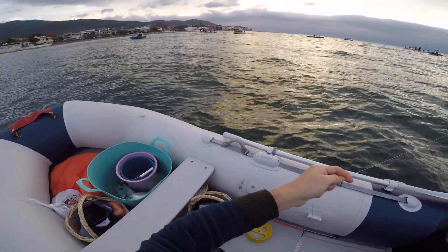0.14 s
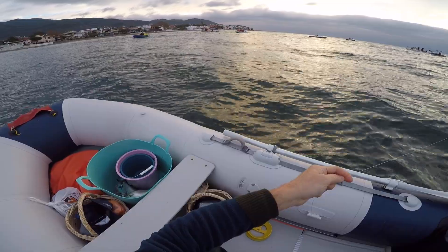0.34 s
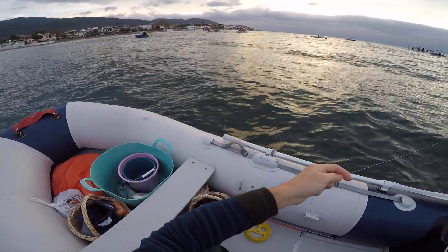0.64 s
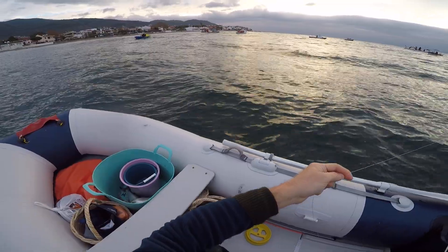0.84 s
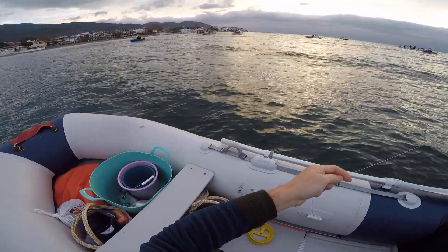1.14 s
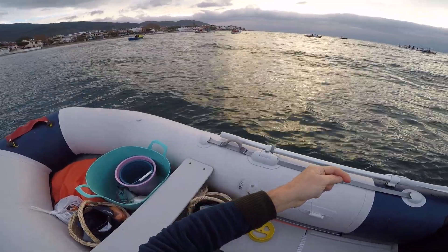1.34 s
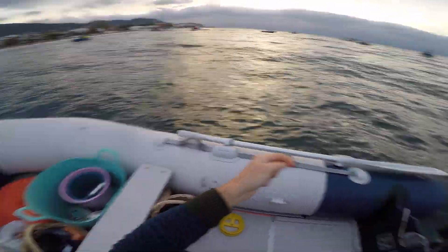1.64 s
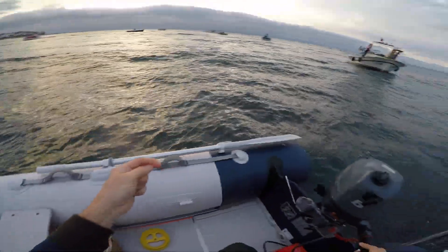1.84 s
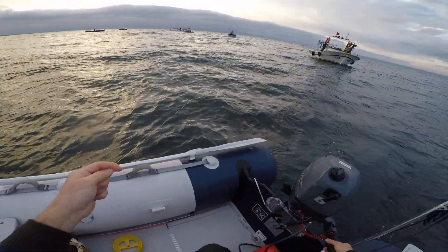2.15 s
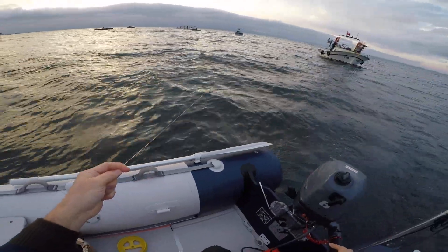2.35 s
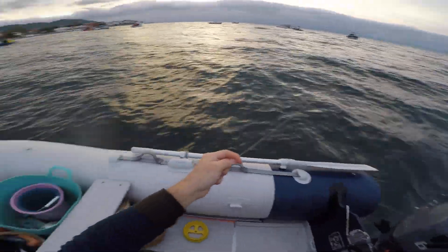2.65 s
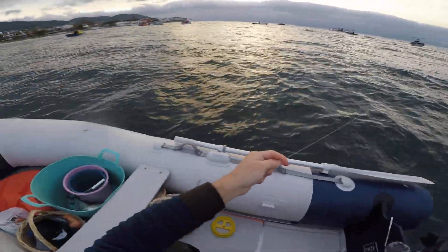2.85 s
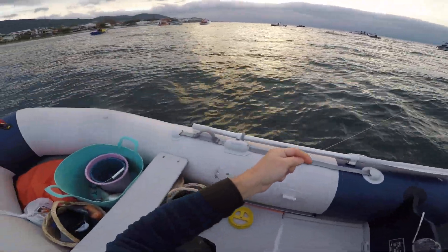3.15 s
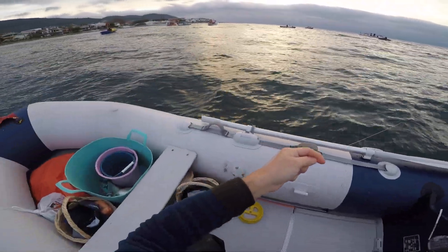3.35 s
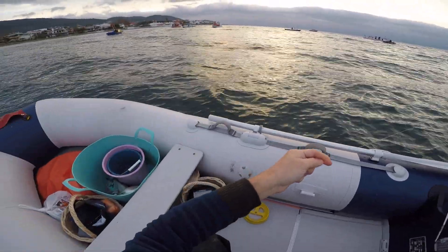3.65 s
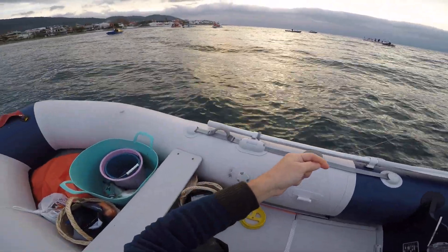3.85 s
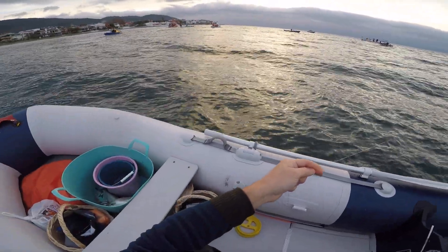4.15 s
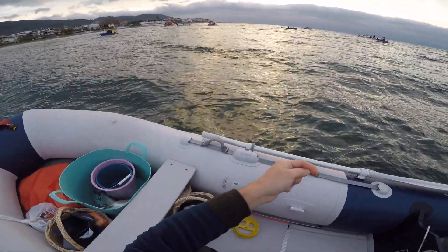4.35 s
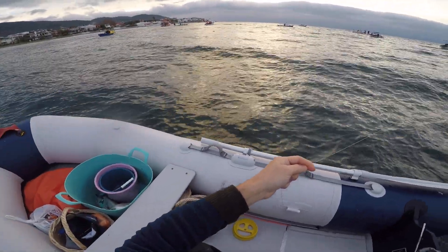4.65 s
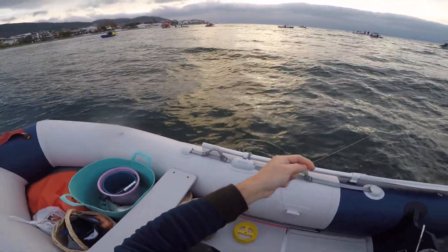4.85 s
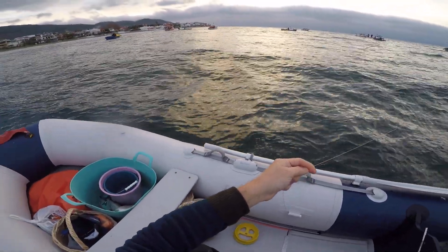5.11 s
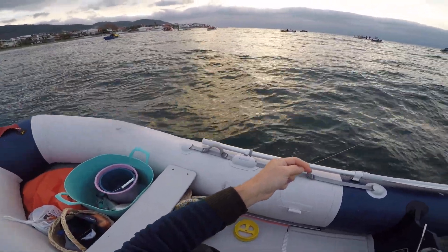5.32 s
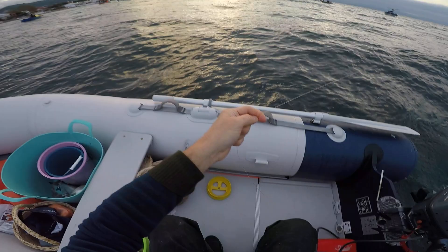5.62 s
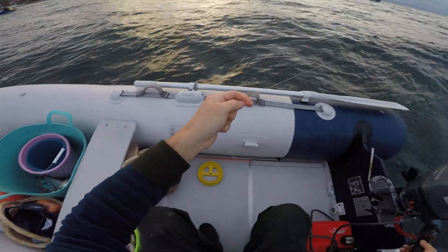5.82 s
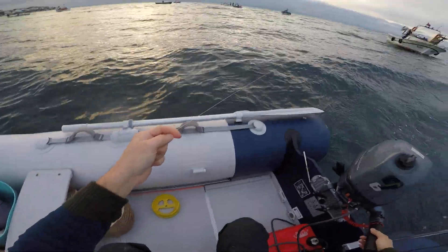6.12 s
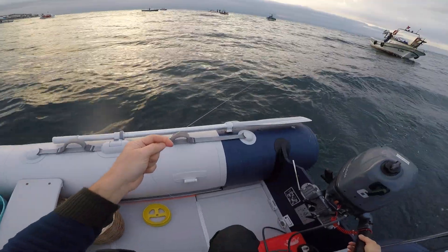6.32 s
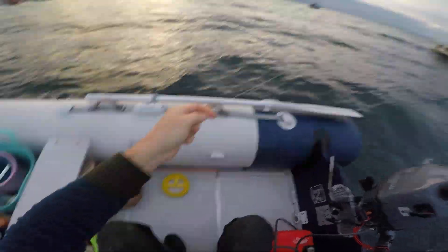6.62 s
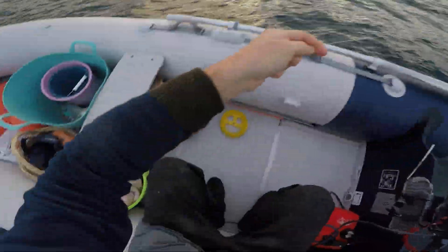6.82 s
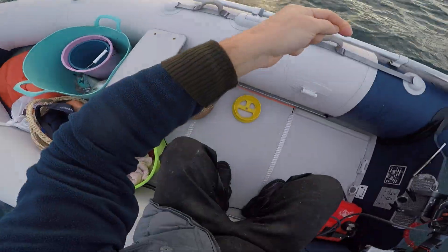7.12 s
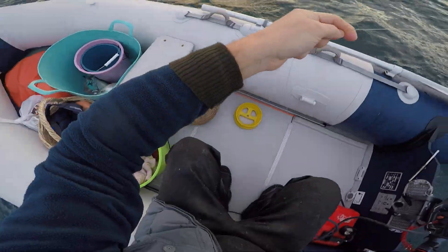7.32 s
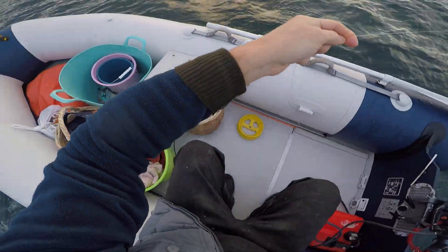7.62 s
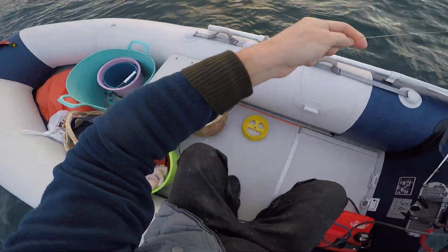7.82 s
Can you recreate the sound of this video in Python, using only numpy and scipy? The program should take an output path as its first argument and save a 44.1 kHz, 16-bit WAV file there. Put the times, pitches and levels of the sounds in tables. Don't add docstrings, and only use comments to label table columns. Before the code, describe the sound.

A small one-cylinder outboard idles continuously for eight seconds, heard close from a head-worn stereo microphone on an inflatable boat. About eleven low exhaust thumps a second, slightly hunting in speed, carry gurgle and a repeating row of hollow casing booms, tappet clicks and ringing metal knocks. From 0 to 1.7 s it is somewhat duller and farther, under rumbling, fluttering wind. Around 1.75 to 2.6 s the head turns and the rattle becomes brighter and more open, with knocks near 1.9 and 2.3 s. It dulls again from 2.8 s; gusts lean right around 3 to 4 s. Wake fizz rises faintly after 4.4 s, with droplet ticks mostly from 4.5 to 6.6 s and a faint high knock at 5.15 s. After 5.7 s the motor is brighter, then fuller and nearer from 6.8 s, with another knock at 7.35 s. It is still running at the end.

```python
import sys
import numpy as np
from scipy import signal
from scipy.fft import rfft, irfft, next_fast_len
from scipy.io import wavfile
from scipy.ndimage import map_coordinates

SR = 44100
rng = np.random.default_rng(int(sys.argv[2]) if len(sys.argv) > 2 else 0)


def invert_db(level):
    return 10 ** (np.asarray(level, dtype=float) / 20)


def inscribe(sig):
    pcm = np.round(np.clip(np.atleast_2d(sig).T, -1, 1) * 32767)
    wavfile.write(sys.argv[1], SR, pcm.astype(np.int16))


N = 351477
STEP = 32

# (time [s], nearness to the motor [dB], turned toward it [0-1], bowed into the boat [0-1])
HEAD = [(0, -2, 0.15, 0.05), (.7, -4.5, 0, 0), (1.56, -1.5, 0, 0), (1.74, -2, 0.97, 0.02),
        (2.5, 0, 0.92, 0.1), (2.8, -0.5, 0.23, 0.2), (3.5, -0.5, 0.2, 0.1), (4.12, 1, .2, 0.3),
        (4.4, 1.5, 0.5, 0.5), (4.7, 0, 0, 0), (5.38, -0.5, 0.2, 0.4), (5.65, 2, 0.67, 0.4),
        (6.3, 0, 0.94, 0.3), (6.6, 1, 0.7, 0.3), (6.85, 0.5, 0.62, 1), (7.25, 0.5, 0.9, 1),
        (7.45, 2.5, 0.7, 0.5), (7.97, 2, 0.55, 0.5)]


def unit(x):
    return x / np.sqrt(np.mean(x ** 2) + 1e-20)


def along(points, hz):
    f, v = np.transpose(points)
    return np.interp(np.log(hz + 1), np.log(f + 1), v)


def curves(rows):
    s, *cols = np.transpose(rows)
    return [np.interp(np.arange(0, N, STEP) / SR, s, c) for c in cols]


def wobble(rate):
    return map_coordinates(rng.standard_normal(400), [np.arange(0, N, STEP) * rate / SR])


def gain_of(db):
    def every_sample(row):
        return np.interp(np.arange(N) / STEP, np.arange(len(row)), row)
    return np.apply_along_axis(every_sample, -1, invert_db(db))


def filtered(x, response):
    m = next_fast_len(N + 4096, True)
    coarse = response(np.fft.rfftfreq(m, 1 / SR)[::8])
    fine = np.repeat(coarse, 8, axis=-1)[..., :m // 2 + 1]
    return irfft(rfft(x, m) * fine, m)[..., :N]


def shaped(x, points):
    return filtered(x, lambda hz: invert_db(along(points, hz)))


def rung(x, modes):
    total = 0
    for k, (hz, width, db) in enumerate(modes):
        strength = gain_of(db + 1.06 * wobble(1.61))
        tone = signal.lfilter(*signal.iirpeak(hz, hz / width, SR), x)
        total = total + (-1) ** k * strength * tone
    return unit(total)


def paired(two, alike):
    def mix(hz):
        turn = np.arccos(np.clip(along(alike, hz), -1, 1)) / 2
        return np.array([np.cos(turn), np.sin(turn)])
    mid, side = filtered(two, mix)
    return np.array([mid + side, mid - side])


def sides(pan_db):
    return invert_db(np.array([pan_db / 2, -pan_db / 2]))


def rings(s, hz, db, fall_ms):
    rise_ms, beat, beat_hz = 1.57, 0.49, 95
    t = np.arange(1024) / SR
    phase = rng.uniform(0, 2 * np.pi, np.shape(s))
    columns = np.broadcast_arrays(s, hz, db, fall_ms, phase)
    s, hz, db, fall_ms, phase = [np.ravel(v)[:, None] for v in columns]
    shape = (1 - np.exp(-1000 * t / rise_ms)) * np.exp(-1000 * t / fall_ms)
    wave = invert_db(db) * shape * np.sin(2 * np.pi * hz * t + phase)
    wave *= 1 + beat * np.cos(2 * np.pi * beat_hz * t)
    at = np.round(np.clip(s, 0, N / SR) * SR).astype(int) + np.arange(len(t))
    return np.bincount(at.ravel(), wave.ravel(), N + SR)[:N]


def gusts(spectra, lumpy_db, rate):
    air = filtered(rng.standard_normal((2, N)), lambda hz: invert_db([along(s, hz) for s in spectra]))
    ports = []
    for port in air:
        lumps = wobble(rate) + 0.32 * wobble(7.5)
        ports.append(unit(port * gain_of(lumpy_db * lumps)))
    return np.array(ports)


def wind():
    # (start [s], length [s], left [dB], right [dB])
    gust_rows = [(-.1, 0.44, -16, -21), (0.442, 0.42, -18, -19), (0.907, 0.44, -20, -18.5),
                 (1.347, 0.27, -22.5, -21), (1.791, 0.096, -18, -18.5), (2.489, 0.15, -16, -22),
                 (2.756, 0.38, -17.5, -25), (3.106, 0.55, -27, -18.5), (3.507, 0.48, -30.5, -19.5),
                 (3.982, 0.37, -27, -27.5), (4.433, 0.11, -24.5, -21.5), (4.588, 0.18, -43.5, -28),
                 (4.815, 0.41, -20.5, -30), (5.197, 0.35, -18.5, -29), (5.49, 0.21, -48, -22),
                 (5.706, 0.22, -42, -32.5), (5.997, 0.34, -20.5, -19), (6.52, 0.2, -21.5, -21.5),
                 (6.896, 0.51, -30.5, -31), (7.522, 0.12, -20, -25.5), (7.75, 0.31, -30, -34.5)]
    # (time [s], left [dB], right [dB])
    breeze = [(0, -12.5, -25), (1.0, -12, -21.5), (1.5, -14, -15), (2.2, -12.5, -22.5), (2.6, -14, -19),
              (3.3, -15.5, -19.5), (4.3, -19, -17.5), (4.9, -12, -19), (5.7, -16.5, -17.5), (6.2, -14, -18),
              (6.7, -14, -19.5), (7.97, -19.5, -17.5)]
    # (frequency [Hz], level [dB per Hz])
    buffet_colour = [(12, -40), (30, -4.5), (50, 0.5), (110, 2), (180, -2), (260, -11.5), (450, -25.5),
                     (900, -76.5)]
    # (frequency [Hz], level [dB])
    right_colour = [(80, -29.5), (170, 0.5), (260, -3), (400, -5.5), (600, -10.5), (1000, -19.5),
                    (1600, -29.5), (4000, -70)]
    # (frequency [Hz], level [dB])
    left_colour = [(80, -25), (170, 2.5), (240, 1), (330, -6.5), (450, -10.5), (700, -21), (1500, -37.5),
                   (4000, -89.5)]
    # (frequency [Hz], level [dB])
    cross = [(150, -6.5), (300, -15.5), (500, -10), (900, -3.5), (1500, -5)]
    calm_db, edge_s, buffet_follows = -47.5, 0.042, 0.15

    start, length, *peak_db = np.transpose(gust_rows)[..., None]
    t = np.arange(0, N, STEP) / SR
    blowing = (np.tanh((t - start) / edge_s) - np.tanh((t - start - length) / edge_s)) / 2
    power = np.sum(invert_db(peak_db) ** 2 * np.abs(blowing), axis=1) + invert_db(calm_db) ** 2
    gust_db = 10 * np.log10(power)

    buffet_db = np.array(curves(breeze)) + buffet_follows * (gust_db + 20.0)
    deep = gusts([buffet_colour, buffet_colour], lumpy_db=-1.4, rate=3.9)
    buffet = paired(deep, [(30, 0.41), (200, 0.55)]) * gain_of(buffet_db)
    flutter = gusts([left_colour, right_colour], lumpy_db=2.0, rate=22) * gain_of(gust_db + 2.5)
    return buffet + flutter - shaped(flutter[::-1], cross)


def water():
    # (time [s], level [dB])
    wake = [(0, -71), (1.5, -76), (2.3, -66.5), (2.95, -69), (3.15, -69.5), (4.4, -62), (5.3, -63),
            (5.7, -69.5), (7.97, -64)]
    # (frequency [Hz], level [dB])
    spray = [(1000, -20), (3000, -1), (5000, -0.5), (7500, 8.5), (10000, -3), (12000, -8.5), (13200, -10),
             (14200, -36), (15000, -98.5)]
    # (time [s], peak [dB], left minus right [dB])
    drops = [(0.5142, -54, -4.5), (0.932, -53, -14), (3.61, -54, -9), (4.4835, -49.5, -8),
             (4.9343, -49.5, 0), (5.2198, -46, -10.5), (5.2735, -54, -18), (5.481, -45, -13),
             (5.5907, -51.5, -6.5), (5.821, -46.5, -6.5), (6.2916, -49, -3.5), (6.575, -56, -4),
             (6.6037, -48.5, -5.5)]

    grains = 1 + 0.24 * rng.exponential(size=N) ** 2
    fizz = rng.standard_normal((2, N)) * grains
    t = np.arange(400) / SR
    for s, db, pan in drops:
        tick = invert_db(db + 76.0 - 60 * t / 0.0042) * rng.standard_normal(len(t))
        fizz[:, round(s * SR):][:, :len(t)] += tick * sides(pan)[:, None]
    return gain_of(curves(wake)[0] + 8.0) * unit(shaped(fizz, spray))


def bumps():
    # (time [s], pitch [Hz], peak [dB], left minus right [dB])
    knocks = [
        (1.883, 616, -22, -3),
        (2.293, 1120, -24, -10),
        (5.15, 1400, -26, -16),
        (7.346, 1340, -24, 6),
    ]
    ratios, levels_db = np.array([.85, 1, 1.14, 1.3]), np.array([-4, -1.0, -7, -12])
    total = 0
    for s, hz, db, pan in knocks:
        knock = rings(np.full(4, s), hz * ratios, db + levels_db, 5.1)
        total = total + sides(pan)[:, None] * knock
    return total


def cycles():
    # (time [s], crank speed [turns per minute])
    speed = [(0.0, 1294.4), (0.53, 1311.2), (1.11, 1338.4), (1.36, 1311.9), (1.98, 1398.1), (2.46, 1371.5),
             (2.86, 1389.0), (3.5, 1333.3), (3.99, 1369.6), (4.58, 1375.4), (4.9, 1369.0), (5.65, 1374.1),
             (5.78, 1313.3), (6.29, 1385.4), (6.81, 1347.8), (7.63, 1381.9), (7.97, 1319.1)]
    s, rpm = np.transpose(speed)
    first = 0.1304
    return first + np.cumsum(np.interp(np.arange(N) / SR, s, rpm)) / (120 * SR)


def drive(run, shares, sizes_db, ms, scatter_db, steady_db, snap_db):
    cycle = np.arange(int(run[-1]) + 2)[:, None]
    chance = rng.standard_normal((len(cycle), len(shares), 2))
    at = np.interp(cycle + shares, run, np.arange(N), left=-SR, right=-SR)
    at = np.round(at + 0.0006 * SR * chance[..., 0]).astype(int).ravel()
    size = invert_db(sizes_db + scatter_db * chance[..., 1]).ravel()
    inside = (at >= 0) & (at < N)
    blows = np.bincount(at[inside], size[inside], N)
    power = signal.lfilter([1], [1, -np.exp(-1000 / (ms * SR))], blows ** 2)
    keep = np.exp(-1000 / SR)
    power = signal.lfilter([1 - keep], [1, -keep], power)
    rattle = np.sqrt(power + invert_db(steady_db) ** 2) * rng.standard_normal((2, N))
    return invert_db(snap_db) * blows * [[1], [0]] + rattle


def exhaust(run):
    top_hz, dip_hz, sag_hz = 226, 90, 25
    start, clears, rise, fall = 0.2379, .1, 0.025, 0.57
    run = run + start
    share = run % 1
    chance = rng.standard_normal((int(run[-1]) + 1, 3))[run.astype(int)].T
    swoop = top_hz * share - dip_hz * clears * (1 - np.exp(-share / clears)) - sag_hz * share ** 3
    turns = swoop / np.gradient(run) / SR
    shape = (1 - np.exp(-share / rise)) ** 2 * np.exp(-(share / fall) ** 3)
    phase = 2 * np.pi * turns * (1 + 0.025 * chance[0]) + 0.36 * chance[2]
    note = invert_db(2.4 * chance[1]) * shape * np.sin(phase)
    return unit(note) * [[np.sqrt(2)], [0]]


def gurgle(run):
    # (frequency [Hz], width [Hz], level [dB])
    pipe = [(188, 46, 5.5), (392, 310, -23)]
    puffs = drive(run, np.array([-.14, .38]), np.array([0, -3]),
                  ms=20, scatter_db=-7.0, steady_db=-3.5, snap_db=3.0)
    return invert_db(-28.0) * rung(puffs, pipe)


def casing(run):
    # (time after the firing [cycles], boom [dB], cowl and tappet [dB],
    # block [dB], cover [dB])
    contacts = [
        (-.53, -2.5, 0.5, -6, -9.5),
        (-.44, -4, -15.5, -11, -12),
        (-.27, 0.5, -13.5, -7.5, -9),
        (-.14, -8.5, 0, -4.5, 1.5),
        (-.09, -10.5, -8.5, -4.5, -4),
        (-.045, 2, -1.5, -3.5, -6.5),
        (.05, -6.5, -15, -6, -8.5),
        (0.151, -14.5, -1.5, -1, -1.5),
        (.27, -6, -5, -24, -11.5),
        (0.402, -16, -18, -17.5, -7),
    ]
    # boom, cowl, block, tappet, cover [ms]
    knock_ms = [9.3, 2.3, 4.7, 1.3, 3.5]
    rattle_db = [-8.5, -10.5, -18, -29, -15]
    snaps_db = [7.3, 21, 17.4, 6.4, 26.4]
    answers = {"boom": (-29.5, 0.7, -0.5, 0.5), "cowl": (-34.5, 1.4, -0.5, 1.5),
               "panel": (-45.5, 1.2, 10, -11), "block": (-36.5, 2, -6, -5.5), "sump": (-44, -0.45, 2, 9),
               "flank": (-46, 1.6, 11.5, -2), "tappet": (-49, 0.3, 8.5, -1.5),
               "cover": (-41.5, 0.7, -6.5, 6)}
    # (frequency [Hz], width [Hz], level [dB])
    boom_modes = [(581, 43, 0), (1042, 28, 3.5), (840, 1470, -4.5)]
    # (frequency [Hz], width [Hz], level [dB])
    cowl_modes = [(1510, 59, 5.5), (1620, 100, -3.5), (1520, 660, -11.5)]
    # (frequency [Hz], width [Hz], level [dB])
    panel_modes = [(1260, 44, 0.01), (1687, 48, 0.0017)]
    # (frequency [Hz], width [Hz], level [dB])
    block_modes = [(1997, 27, 2.5), (2160, 37, 3), (2320, 620, -9.5)]
    # (frequency [Hz], width [Hz], level [dB])
    flank_modes = [(2476, 18, 3), (3600, 330, 0.5), (3985, 130, 1), (4670, 510, -8)]
    # (frequency [Hz], width [Hz], level [dB])
    sump_modes = [(2747, 37, 9), (2945, 37, 7), (3160, 65, -7.5), (3420, 60, -2.5), (3100, 1100, -9.5)]
    # (frequency [Hz], width [Hz], level [dB])
    tappet_modes = [(6270, 160, -4), (5250, 200, -5.5), (5460, 2000, -16.5)]
    # (frequency [Hz], width [Hz], level [dB])
    cover_modes = [(6750, 590, -0.61), (7630, 650, -1.4)]

    shares, boom_db, cowl_db, block_db, cover_db = np.transpose(contacts)
    sizes = boom_db, cowl_db, block_db, cowl_db, cover_db
    driven = []
    for db, ms, rest_db, snap_db in zip(sizes, knock_ms, rattle_db, snaps_db):
        driven.append(drive(run, shares, db, ms, 1.6, rest_db, snap_db))
    boom, cowl, block, tappet, cover = driven
    bodies = {"boom": (boom, boom_modes), "cowl": (cowl, cowl_modes), "panel": (cowl, panel_modes),
              "block": (block, block_modes), "flank": (block, flank_modes), "sump": (block, sump_modes),
              "tappet": (tappet, tappet_modes), "cover": (cover, cover_modes)}

    near_db, turned, bowed = curves(HEAD)
    total = np.zeros((2, N))
    for part, (blows, modes) in bodies.items():
        db, nearer, turn_db, bow_db = answers[part]
        level_db = db + nearer * near_db + turn_db * turned + bow_db * bowed
        total += gain_of(level_db) * rung(blows, modes)
    return total


def pings(run):
    # (time [cycles], frequency [Hz], peak [dB], when turned [dB], when bowed [dB])
    spots = [(-0.097, 5800, -39, -1.5, -1), (-0.015, 5300, -39, 1.5, -4.5), (-0.16, 8300, -44, -2, -1),
             (0.52, 5200, -52.5, -3.5, 3.5), (-0.016, 5500, -42, -5, -4.5), (0.033, 7500, -50.5, -2.5, 3),
             (-0.39, 10000, -42, -5, 1), (-0.15, 5000, -41, -3, 2), (0.06, 7600, -42, -1, 5),
             (-.06, 1665, -36, 10.5, 0), (-0.064, 1700, -34, -4, 11.5), (0.18, 1300, -38.5, -9.5, -3.5),
             (0.445, 1520, -32.5, -0.5, 4), (-0.16, 1520, -29.5, -1, 1.5), (.145, 1530, -36, -3, 3.5),
             (-.34, 1200, -40, 6.5, -11), (-.29, 2150, -32, -7, -0.5), (-0.17, 2200, -42, -3, 0),
             (0.15, 3200, -39.5, 1.5, -2), (-.12, 2900, -42.5, 10, -6.5), (0.145, 3300, -41.5, -1, 4.5),
             (0.1, 4600, -49.5, 0, 10), (-0.19, 3900, -48, -1, -1.5), (-0.016, 2480, -43.5, 11.5, -0.5),
             (-.11, 3400, -44, 13, -2.5), (0.16, 5700, -42.5, 3.5, -1.5), (0.13, 3960, -42, 6.5, -2),
             (-0.024, 4280, -48, 7, -7), (-0.3, 2760, -40.5, 6.5, 6), (0.017, 3600, -46.5, 0, 5.5),
             (0.23, 3000, -43, 2.5, 6), (-0.2, 2500, -45.5, 0.5, 11.5), (0.019, 2780, -44, 2.5, 12.5),
             (-.04, 3800, -48.5, 2.5, 12), (0.0094, 3700, -48, 1, 12), (0.021, 3000, -48, 1, 1),
             (-0.18, 3750, -38, 0, 3.5), (-.03, 1030, -30.5, 1.5, 1.5), (.07, 1035, -31.5, -1, 0),
             (.2, 2400, -40, -2, -1)]
    scatter_db, detune, jitter_s = 1.0, .006, .0006
    share, hz, db, turn_db, bow_db = np.transpose(spots)
    cycle = np.arange(1, int(run[-1]) + 2)[:, None]
    chance = rng.standard_normal((3, len(cycle), len(share)))
    s = np.interp(cycle + share, run, np.arange(N) / SR) + jitter_s * chance[0]
    near_db, turned, bowed = [np.interp(s, np.arange(0, N, STEP) / SR, c) for c in curves(HEAD)]
    level_db = db + 9.0 + 0.55 * near_db + turn_db * turned + bow_db * bowed + scatter_db * chance[1]
    fall_ms = 7 * (hz / 1000) ** -0.25
    return rings(s, hz * (1 + detune * chance[2]), level_db, fall_ms)


def at_ports(parts, turned):
    # (frequency [Hz], likeness [-1 to 1])
    likeness = [(200, 0.51), (600, 0.058), (1000, 0.18), (1500, 0.069), (3000, 0.12), (4500, 0.97),
                (6500, 0.58), (8500, 0.26)]
    # (frequency [Hz], left minus right [dB])
    shade = [(200, 0.5), (600, 1), (1000, -12.5), (1500, -17), (2000, -9.5), (2800, -9), (4000, -4.5),
             (6000, 0.5), (7300, -2), (8300, -16), (10000, -17.5)]
    # (frequency [Hz], left leads by [radians])
    lead = [(240, 0.43), (430, -2), (780, -3.5), (1210, -2.5), (1550, -3), (1810, -7), (2150, -1.5),
            (2500, -6), (3960, -7.5), (4570, -7), (5000, -8), (5430, -8.5), (7840, -10), (8790, -3.5)]
    # (frequency [Hz], level [dB])
    shell = [(150, -4.5), (1200, 1), (2500, -4), (3500, -8.5), (5000, -11), (6200, -3), (7800, -5.5),
             (9000, -11.5), (11000, -19.5), (14000, -48)]

    def left_port(hz):
        return invert_db(along(shade, hz)) * np.exp(1j * along(lead, hz))

    def both_ports(hz):
        return invert_db(along(shell, hz)) * [left_port(hz), np.ones_like(hz)]

    left, right = filtered(paired(parts, likeness), both_ports)
    shadowed = shaped(left, [(900, -20.0), (1600, -2.0), (5000, -1.0), (8000, -5.0)])
    opening = gain_of(7 * (turned - 0.47)) - 1
    return np.array([left + opening * shadowed, right])


def motor():
    _, turned, bowed = curves(HEAD)
    run = cycles()
    thump_db = -25.5 + 1.9 * turned + 2.0 * bowed + 0.25 * wobble(1.0)
    parts = gain_of(thump_db) * exhaust(run) + gurgle(run) + casing(run)
    parts[0] += pings(run)
    return at_ports(parts, turned)


def scene():
    return wind() + water() + bumps() + motor()


def roll_off(x):
    return signal.sosfilt(signal.butter(12, 14250, fs=SR, output="sos"), x)


def record(dry):
    soft = dry / (1 + np.abs(dry / 0.87) ** 4) ** 0.23
    return roll_off(soft)


dry = scene()
out = record(dry)
inscribe(out)
```